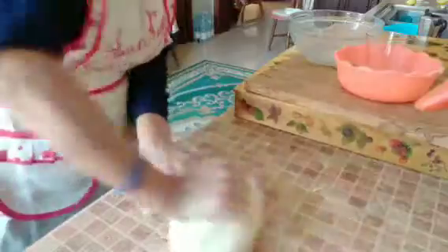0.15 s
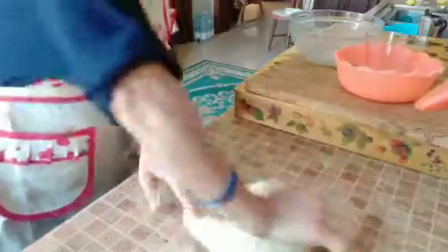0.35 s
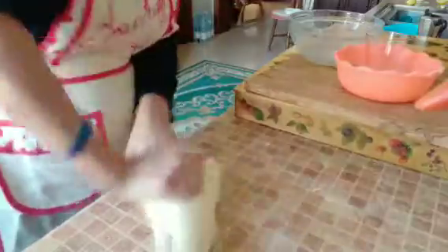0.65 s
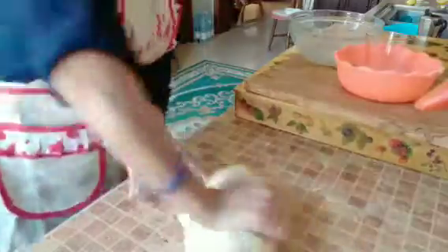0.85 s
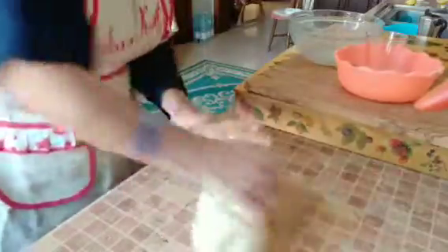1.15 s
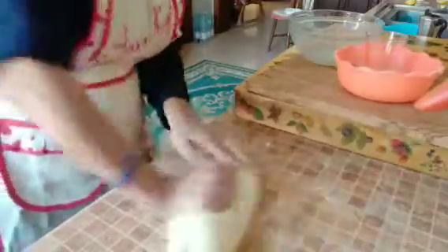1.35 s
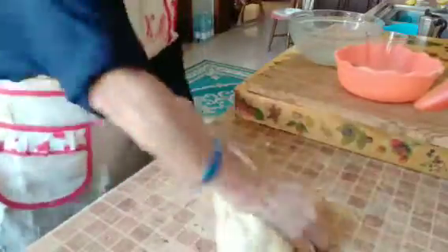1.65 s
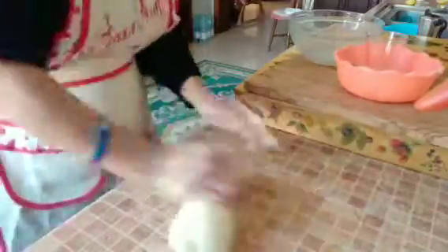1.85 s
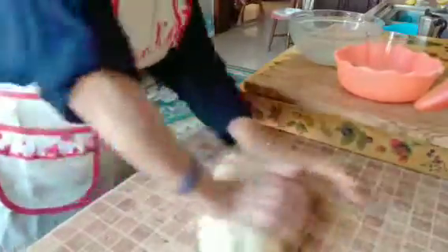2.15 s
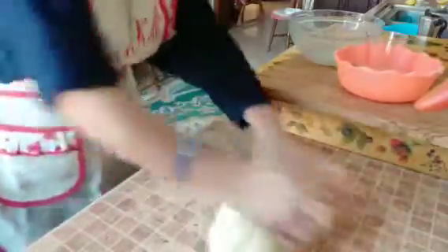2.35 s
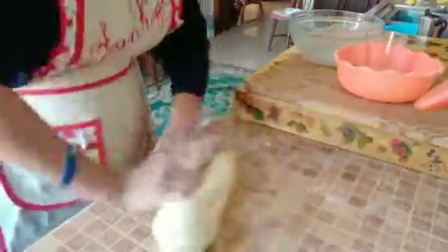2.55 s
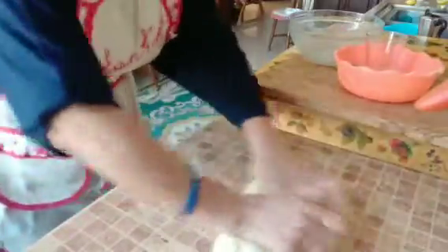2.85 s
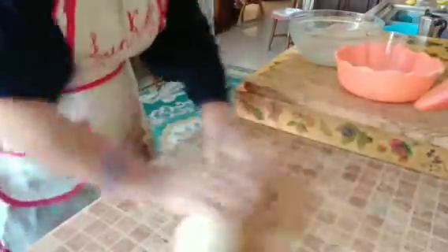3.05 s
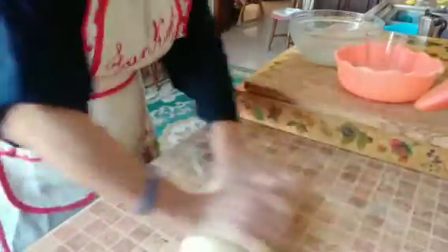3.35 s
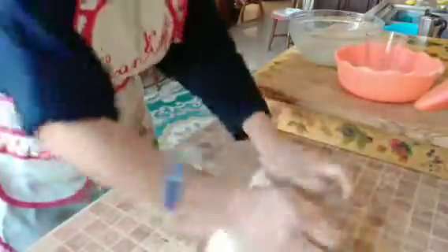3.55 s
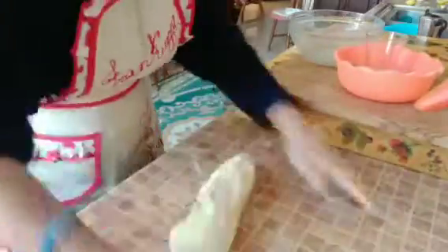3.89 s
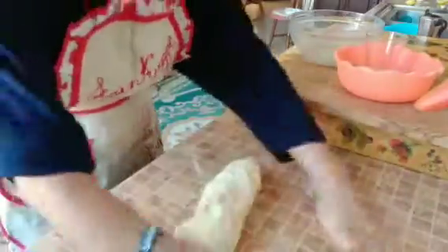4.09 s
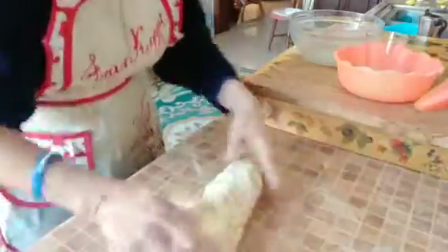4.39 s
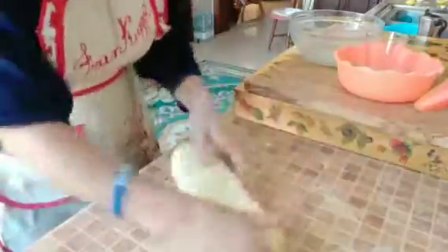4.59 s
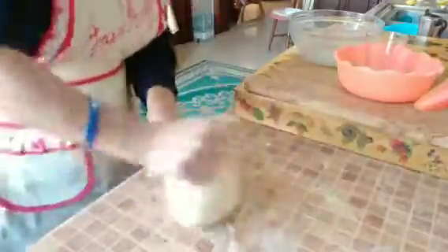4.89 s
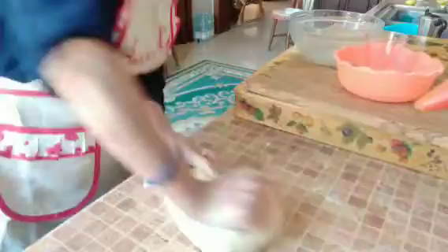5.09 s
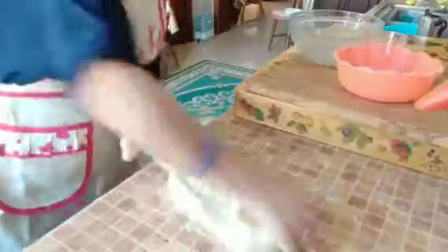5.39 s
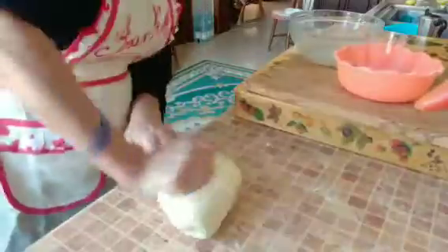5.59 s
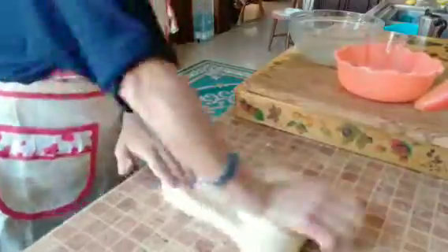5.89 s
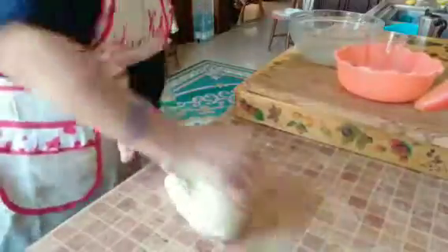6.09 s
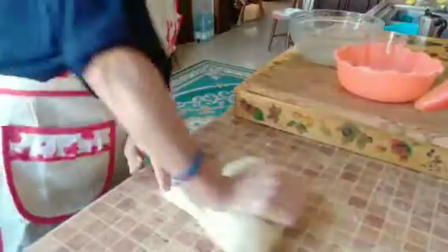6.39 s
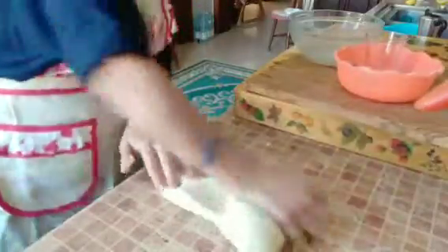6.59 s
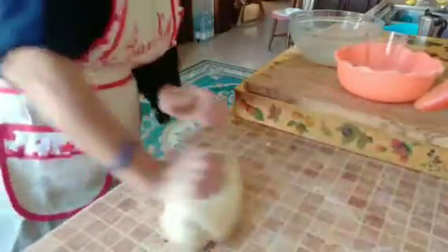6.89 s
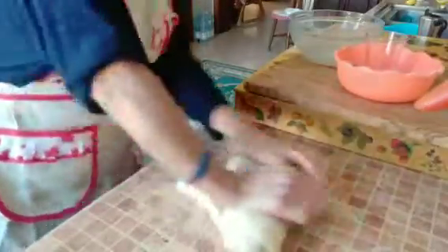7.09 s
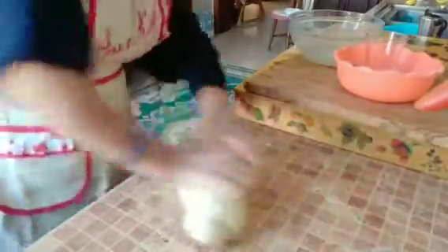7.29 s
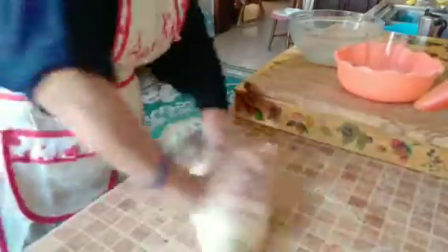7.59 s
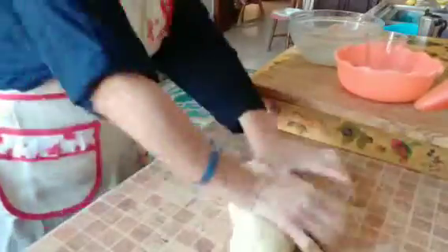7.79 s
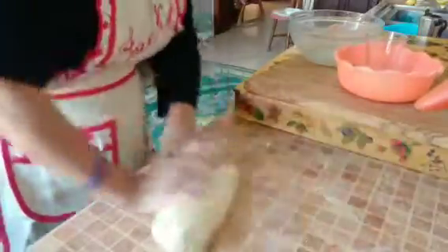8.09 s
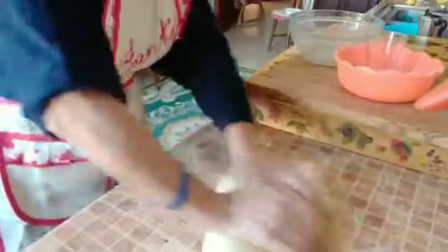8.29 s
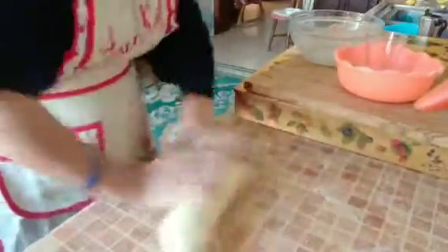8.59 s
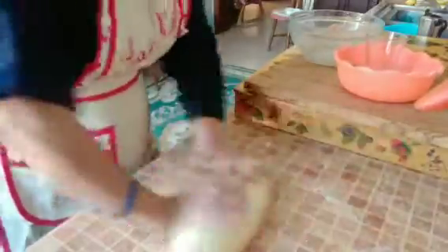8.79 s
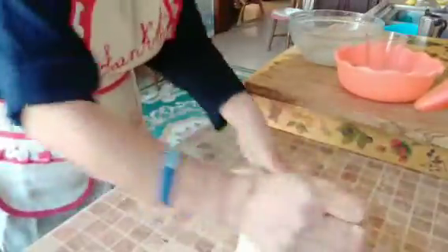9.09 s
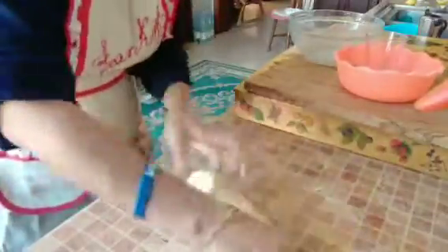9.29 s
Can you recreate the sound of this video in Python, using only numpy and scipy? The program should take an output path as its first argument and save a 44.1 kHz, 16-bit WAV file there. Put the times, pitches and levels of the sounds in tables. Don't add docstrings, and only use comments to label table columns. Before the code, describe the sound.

Dough is pushed and folded on a shaky tabletop, with rhythmic floury scuffs, low thumps and one harsh double sweep across the bare surface.

```python
import sys
import numpy as np
from scipy import signal
from scipy.fft import rfft, irfft, next_fast_len
from scipy.io import wavfile
from scipy.ndimage import uniform_filter1d

SR = 44100
rng = np.random.default_rng(int(sys.argv[2]) if len(sys.argv) > 2 else 0)


def to_linear_factor(level_db):
    exponent = np.asarray(level_db, float) / 20
    return 10 ** exponent


def wav_record(signal):
    frames = np.transpose(np.atleast_2d(signal))
    bounded = np.clip(frames, -1, 1)
    quanta = np.round(bounded * 32767).astype(np.int16)
    wavfile.write(sys.argv[1], SR, quanta)


N = 416744


def evened(x):
    return x / np.sqrt(np.mean(x ** 2) + 1e-20)


def read(points, hz):
    f, value = np.transpose(points)
    return np.interp(np.log(hz + 1), np.log(f + 1), value)


def wander(hz):
    t = np.arange(0, N + 64, 64) / SR
    slow = 0
    for f in np.geomspace(hz / 20, hz, 24):
        slow = slow + np.sin(2 * np.pi * (f * t + rng.random())) / np.sqrt(f)
    return evened(np.interp(np.arange(N) / SR, t, slow))


def patches(shape, bins, frames):
    noise = uniform_filter1d(rng.standard_normal(shape), bins, axis=0)
    return evened(uniform_filter1d(noise, frames, axis=1))


def ring(x, modes):
    out = 0
    for k, (hz, width, db) in enumerate(modes):
        b, a = signal.iirpeak(hz, hz / width, SR)
        out = out + (-1) ** k * to_linear_factor(db) * signal.lfilter(b, a, x)
    return out


# (frequency [Hz], likeness [-1 to 1])
LIKENESS = [(60, 0.97), (150, 1), (300, 0.68), (700, 0.54), (1400, 0.39), (2500, 0.21), (5000, 0.068),
            (10000, 0.16)]
# (frequency [Hz], left over right [dB])
LEAN = [(60, 3), (120, -0.5), (240, -1.5), (480, 1), (950, 0.5), (1890, 0.0), (3770, -2.0), (7520, -6),
        (15000, 3.5)]


def ports(a, b, colour=((1, 0), (2, 0)), lag_s=0):
    size = next_fast_len(N)
    hz = np.fft.rfftfreq(size, 1 / SR)
    same = np.clip(read(LIKENESS, hz), -1, 1)
    za, zb = rfft(a, size), rfft(b, size)
    lean = to_linear_factor(read(LEAN, hz) / 2) * np.exp(-1j * np.pi * hz * lag_s)
    left = za * lean
    right = (same * za + np.sqrt(1 - same ** 2) * zb) / lean
    return irfft(np.array([left, right]) * to_linear_factor(read(colour, hz)), size)[:, :N]


# (frequency [Hz], level [dB per Hz])
AIR_COLOUR = [(12, -33), (20, 11), (60, -14.5), (127, -7), (193, -23.5), (255, -15), (499, -25),
              (590, -23.5), (738, -49), (1150, -27.5), (4300, -32), (7950, -30.5), (13500, -32.5),
              (14700, -29), (16000, -65)]


def kitchen_air():
    return to_linear_factor(-57) * evened(ports(*rng.standard_normal((2, N)), AIR_COLOUR))


def fridge():
    turns = np.cumsum(48.64 + 1.1 * wander(5)) / SR
    motor = to_linear_factor(2.5 * wander(10)) * np.sqrt(2) * np.sin(2 * np.pi * turns)
    cabinet = evened(ring(ring(rng.standard_normal(N), [(43.0, 61, 0)]), [(44.8, 66, 0)]))
    return to_linear_factor(-51) * (motor + to_linear_factor(-10.5) * cabinet) * to_linear_factor([[.3], [-.3]])


# (time [s], peak level [dB], length [s])
JOLTS = [
    (2.91, -41, 0.0064),
    (3.18, -32, 0.0055),
    (4.201, -44, 0.0073),
    (5.428, -32.5, 0.0077),
]


def heel_jolts():
    out = np.zeros(N)
    for s, db, length_s in JOLTS:
        bump = np.hanning(round(length_s * SR))
        push = to_linear_factor(db) * np.concatenate([bump, -.5 * np.repeat(bump, 2)])
        out[round(s * SR):][:len(push)] += push
    return out


def blow(t, contact_s):
    chance = rng.random(len(t)) < 200 / SR
    force = 0.6 * np.exp(-t / 0.013) * chance * rng.standard_normal(len(t))
    force[0] = -1.5
    return np.convolve(force, np.hanning(round(contact_s * SR) + 3))[:len(t)]


# (frequency [Hz], width [Hz], level [dB])
PANEL = [(173.7, 21.6, -4), (243.4, 29.7, 1), (287, 40, 2), (427.2, 26.6, -1.5), (506, 48, -11.5)]
# (frequency [Hz], width [Hz], level [dB])
HARD_EDGE = [(594, 47, -0.5), (818.3, 83.5, -2.5), (851.6, 109, -4), (1072, 50, -11.5)]
# (frequency [Hz], width [Hz], level [dB])
THUD = [(334, 430, 0)]
# (time [s], upper tones [dB])
PLACE = [(.1, -6), (.45, 3), (1.02, -5), (2.3, 0), (3.17, 2), (3.65, 4), (4.0, 8), (4.44, 0), (5.34, -3),
         (5.43, -3), (6.0, 0.5), (6.56, 2), (7.28, 2), (7.9, -2), (8.5, 2), (8.95, 2), (9.25, -4),
         (9.27, -3)]


def pushes(rows):
    out, t = np.zeros((2, N + SR)), np.arange(SR // 4) / SR
    for s, db, hz, sway_db, edge_db, rock_s in rows:
        rock = t ** 0.7 * np.exp(-t / 0.011) * np.sin(2 * np.pi * hz * t - 1.2)
        out[:, round((s + rock_s) * SR):][:, :len(t)] += to_linear_factor(db + sway_db + 3.0) * rock / abs(rock).max()
        landing = blow(t, 0.0011)
        upper_db = np.interp(s, *np.transpose(PLACE))
        panel = [(f, width, mode_db + upper_db * (f > 350)) for f, width, mode_db in PANEL]
        # level dB, softness of the contact in samples, tones
        for part_db, soft, modes in [(6.0, 45, panel), (5.5, 70, THUD), (edge_db + 5.5, 22, HARD_EDGE)]:
            softened = np.convolve(landing, np.hanning(soft + 2))[:len(t)]
            sound = ring(softened, modes) * np.exp(-t / 0.77)
            heard = np.array([sound, np.gradient(sound)])
            heard = heard / abs(heard).max(1)[:, None]
            out[:, round((s + .006) * SR):][:, :len(t)] += to_linear_factor(db + part_db) * heard
    return ports(*out[:, :N])


KNOCK_ROCK_S, SHOVE_ROCK_S = .005, .002

# (time [s], panel level [dB], hard edge against the panel [dB])
TAPS = [(.279, -61, 0), (.544, -55, -6), (.655, -58.5, -5), (1.084, -58, 0), (1.824, -60.5, 8),
        (2.396, -57, -5), (2.479, -62, -2), (2.734, -59, 2.5), (2.846, -62, 2), (2.995, -62, 5),
        (3.06, -60, 3), (3.344, -61, 2), (3.419, -59, 1), (3.628, -55, -8), (4.007, -50, 2),
        (4.036, -53, 7.5), (4.218, -61.5, 3), (4.381, -63.5, 8), (4.429, -49.5, -1), (4.55, -57, -2),
        (5.127, -58, -5), (5.216, -57, -3), (5.349, -54, 5.5), (5.86, -64, 1), (6.545, -48, -8),
        (7.103, -59, -3), (7.231, -59, -5), (7.879, -55, -3), (7.976, -65, 4), (8.329, -58, -7),
        (8.498, -57, -3), (9.355, -54.5, -0.5), (.453, -41, -8), (.436, -55, -2), (1.023, -49, 7),
        (3.015, -59, 5), (3.035, -60, 4), (3.695, -54, -2), (6.559, -47, 5), (7.258, -53, -1),
        (7.305, -57, 2.5), (.559, -53.5, -9)]
# (time [s], sway level [dB], sway frequency [Hz])
MORE_ROCKS = [(3.978, -43, 85), (4.522, -46.5, 120), (4.546, -48, 110), (9.3, -41, 100), (.142, -52, 102),
              (1.389, -54, 100), (1.474, -53, 116), (1.663, -56, 94), (2.242, -52, 92), (2.676, -56, 105),
              (2.993, -53, 97), (3.195, -46, 97), (3.672, -44, 110), (4.036, -49, 92), (4.41, -47, 103),
              (6.102, -47, 94), (6.585, -45, 101), (7.115, -47, 92), (7.34, -48, 110), (7.364, -48, 118),
              (7.41, -46, 118), (7.989, -54, 100), (8.349, -51, 98), (9.105, -51, 97), (3.36, -52, 110),
              (3.42, -49, 105), (3.47, -53, 100), (5.6, -53, 105), (8.82, -51, 120), (4.57, -49, 100)]


def fingers():
    taps = [(s, db, 100, -20, edge_db, KNOCK_ROCK_S) for s, db, edge_db in TAPS]
    rocks = [(s, db - 30, hz, 30, 0, SHOVE_ROCK_S) for s, db, hz in MORE_ROCKS]
    return pushes(taps + rocks)


# (time [s], panel level [dB], sway frequency [Hz],
# sway against the panel [dB], hard edge against the panel [dB])
KNOCKS = [(.093, -54, 97, 2, -13), (.298, -59, 90.6, 5, -8), (.445, -38, 110, -7, -11),
          (.574, -55, 74, -12, -14), (1.012, -36.5, 102.7, -7, -2.5), (1.075, -49, 100, 4, -24),
          (2.289, -62.5, 93, 6, 9.5), (3.65, -47.5, 119.4, 7, 2), (3.998, -54, 72, -11, 10),
          (4.019, -54, 73.5, 7, 12), (4.943, -57.5, 97, 2, -9), (5.327, -50, 100, -6, -10),
          (5.34, -42, 107, -1, -16), (5.379, -55, 89, 14, 1), (5.421, -48, 102, 7, -16),
          (5.96, -49.5, 128, 0, -14), (6.555, -31.5, 94.4, -3, -4.5), (6.679, -53, 90, 9, -15),
          (7.279, -50, 111, 7.5, -19), (7.903, -49, 93, 2, -21), (8.935, -49, 94, -.6, -22),
          (8.992, -46.5, 81.5, -20, -6), (9.253, -38, 73.5, -12, -10), (9.267, -33.5, 90, -4, -19)]
# (time [s], sway level [dB], sway frequency [Hz],
# panel against the sway [dB])
SHOVES = [(.347, -48, 99, -12), (1.209, -51, 107, -11), (1.796, -44.5, 101, -17), (1.879, -44, 104, -19),
          (1.96, -51, 106, -16), (2.091, -50.5, 110, -7.5), (2.131, -52, 110, -3.5),
          (3.751, -49.5, 115, -14), (4.79, -54.5, 110, -23), (5.909, -47, 114, -9), (6.199, -51, 110, -12),
          (6.27, -50, 112, -19), (6.9, -55, 127, -13), (7.49, -51, 125, -13), (8.041, -53, 110, -20),
          (2.419, -50, 108, -20), (2.595, -43.5, 75, -21), (2.905, -44, 88.5, -16), (3.132, -43, 105, -28),
          (3.175, -44.5, 93, -11.5), (3.952, -36.5, 88, -19), (4.441, -35.5, 108, -30),
          (4.495, -40, 113, -23), (4.69, -44, 97, -11), (5.259, -45, 102, -13), (6.05, -37.5, 100, -15),
          (6.812, -44.5, 110, -36), (7.379, -44.5, 122, -19), (8.526, -43, 106, -5.5)]


def heel():
    knocks = [row + (KNOCK_ROCK_S,) for row in KNOCKS]
    shoves = [(s, db + panel_db, hz, -panel_db, -4.5, SHOVE_ROCK_S) for s, db, hz, panel_db in SHOVES]
    return pushes(knocks + shoves)


def cracks(rows):
    out, t = np.zeros((2, N + SR)), np.arange(1800) / SR
    for s, db, hz, pan_db, length_s in rows:
        shape = np.exp(-t / max(length_s, .0003)) + 0.13 * np.exp(-t / 0.011)
        burst = ring(shape * rng.standard_normal((2, len(t))), [(hz, 0.87 * hz, 0)])
        burst = ring(burst, [(hz, 1.0 * hz, 0)])
        crack = ring(burst, [(hz, 0.23 * hz, 0), (3300, 900, -18), (12500, 2000, -10)])
        crack = to_linear_factor([[pan_db / 2], [-pan_db / 2]]) * crack / abs(crack).max(1)[:, None]
        out[:, round(s * SR):][:, :len(t)] += to_linear_factor(db + 5.5) * crack
    return out[:, :N]


# (time [s], peak level [dB],
# # frequency [Hz], left over right [dB], length [s])
MORE_CRACKS = [(3.6515, -47, 3720, -3, .004), (4.435, -46, 6200, -2, .003), (4.841, -54, 8600, -2, .003),
               (6.923, -50, 7650, -3, .003), (7.495, -51, 8300, -4, .004), (7.495, -56, 4200, -4, .004),
               (7.903, -45, 7900, -3, .003), (8.723, -54, 6460, -1, .003), (9.35, -52, 4000, -4, .003),
               (.568, -58, 1100, 0, .012), (.66, -58, 1700, 0, 0.0037), (2.6115, -31, 8250, -4, .0015),
               (4.0, -44, 7500, -4, .008), (4.012, -43, 7000, -4, .006), (4.024, -44, 6000, -4, .006),
               (4.04, -45, 8000, -4, .008), (4.05, -45, 7200, -4, .005), (4.148, -41, 6800, -4, .008),
               (4.0, -51, 2080, -2, 0.014), (4.04, -49, 2500, -2, .015), (4.172, -49, 2800, -2, .008),
               (3.657, -49.5, 1700, -3, .006)]


def more_cracks():
    return cracks(MORE_CRACKS)


# (time [s], peak level [dB], frequency [Hz], left over right [dB], length [s])
SCUFFS = [(.57, -52.5, 2000, 0, 0.0095), (3.656, -50, 1490, 0, 0.0057), (3.999, -44.5, 404, 3, .03),
          (3.998, -41, 1070, 0, .03), (5.378, -42, 1400, -1, 0.013), (.432, -53, 520, -2, 0.023),
          (4.433, -53, 590, 0, 0.005), (3.653, -51, 690, 0, 0.0086), (6.56, -37.5, 620, -3, 0.011),
          (9.268, -53, 1340, 0, 0.0087), (4.03, -49, 1760, -2, .02)]


def palm_scuffs():
    return cracks(SCUFFS)


# (time [s], peak level [dB], frequency [Hz], left over right [dB], length [s])
SNAPS = [(0.092, -50.5, 7900, -8, 0.0015), (0.44, -46, 7100, -8, 0.0027), (0.443, -46, 6500, -4, .003),
         (1.019, -40.5, 7760, -3, 0.0044), (2.294, -44, 7300, -3, 0.0025), (2.608, -34, 12000, 4, 0.006),
         (2.6114, -26.5, 9930, -13.5, 0.00061), (2.6134, -34, 9100, -4, 0.0048),
         (2.633, -44, 9000, 3, 0.004), (3.653, -43, 5360, -4, 0.0063), (3.657, -42, 7600, -5, 0.0022),
         (3.96, -54, 6660, -2, .003), (4.445, -45, 6200, -2, 0.0044), (5.386, -39, 7500, -3, 0.0027),
         (8.95, -41.5, 7300, -11, 0.0022), (8.952, -41, 6840, -7, .0012), (9.261, -42, 10000, 2, .003),
         (9.355, -55, 7600, -4, 0.0035), (2.6112, -39, 3400, -6.5, 0.00059)]


def dough_snaps():
    return cracks(SNAPS)


def strokes(rows, roundness, column=3, linger=1):
    t, rows = np.arange(0, N + 64, 64)[:, None] / SR, np.array(rows)
    off = t - rows[:, 0]
    away = np.where(off < 0, -off / abs(rows[:, 1]), off / abs(linger * rows[:, 2]))
    gains = to_linear_factor(rows[:, column] - 23 * np.minimum(away, 4) ** roundness)
    return np.interp(np.arange(N) / SR, t[:, 0], np.sqrt((gains ** 2).sum(1)))


# (peak time [s], rise [s], fall [s], rubbing level [dB])
FOLDS = [(0, .05, .07, -62.5), (.094, .04, 0.063, -62.5), (.30, .12, 0.19, -58.5), (.62, 0.12, 0.12, -60.5),
         (.86, 0.19, 0.37, -59), (1.22, 0.15, 0.12, -63.5), (1.47, 0.22, 0.31, -60),
         (1.71, 0.12, 0.18, -56.5), (2.21, 0.26, 0.11, -56.5), (2.32, 0.11, 0.3, -58),
         (2.53, 0.078, 0.096, -73), (2.66, 0.1, 0.15, -60.5), (3.22, 0.16, 0.055, -71),
         (3.74, .1, 0.092, -61), (4.87, 0.16, 0.16, -65), (5.12, 0.13, 0.29, -62),
         (5.27, 0.093, 0.058, -56.5), (5.75, 0.12, 0.16, -61), (5.9, 0.16, 0.053, -60.5),
         (6.33, 0.16, 0.5, -63.5), (6.95, 0.075, .25, -61.5), (7.12, 0.12, 0.095, -59),
         (8.17, 0.1, 0.16, -64), (8.35, 0.21, 0.12, -57.5), (8.77, 0.072, 0.34, -58),
         (9.17, 0.026, 0.14, -63.5), (9.41, 0.13, 0.06, -54.5)]


def folding(linger=1):
    return strokes(FOLDS, 2.16, linger=linger)


# (peak time [s], rise [s], fall [s], rubbing level [dB],
# weight on the table [dB])
PRESSES = [(.49, 0.077, 0.061, -48.5, -50), (.575, 0.05, 0.041, -56.5, -58),
           (1.07, 0.1, 0.13, -54.5, -55.5), (1.84, 0.097, 0.079, -56, -60.5),
           (2.42, 0.052, 0.091, -68, -62), (2.9, 0.27, 0.085, -52.5, -62), (3.05, 0.094, 0.2, -51.5, -58.5),
           (3.43, 0.28, 0.35, -54.5, -60.5), (3.67, 0.057, 0.08, -56.5, -55.5),
           (4.44, 0.12, 0.059, -55.5, -58), (4.61, 0.19, 0.15, -50, -61.5), (5.41, 0.12, 0.2, -49.5, -52.5),
           (5.52, 0.24, 0.084, -52.5, -63), (6.01, 0.1, 0.18, -52, -58.5), (6.15, 0.15, 0.081, -53, -58.5),
           (6.63, 0.13, 0.21, -53.5, -53), (6.73, 0.2, 0.11, -49.5, -55), (7.3, 0.098, 0.11, -52, -54.5),
           (7.53, 0.063, 0.25, -52.5, -66), (7.68, .15, 0.32, -57, -71), (7.91, 0.088, .12, -53, -56),
           (8.55, 0.1, 0.12, -49.5, -52.5), (8.98, 0.064, .2, -50, -56.5), (9.27, 0.023, 0.033, -48.5, -60)]


def pressing(column=3, linger=1):
    return strokes(PRESSES, 1.415, column, linger)


# (time [s], rubbing level [dB])
SWEEP = [
    (3.938, -80),
    (3.947, -57.5),
    (3.985, -49.5),
    (4.016, -38),
    (4.106, -44.5),
    (4.156, -40),
    (4.225, -45),
    (4.25, -56.5),
    (4.32, -67),
]


def sweeping():
    s, db = np.transpose(SWEEP)
    return to_linear_factor(np.interp(np.arange(N) / SR, s, db, -120, -120))


# (frequency [Hz], width [Hz], level [dB])
SWAY = [(75, 13, -1.5), (108, 10.8, 0), (156, 54, -11)]


def shaking():
    usual_db, sweep_weight_db, linger = -65, -25, 1.1
    lumps = rng.standard_normal((3, 2, N))
    grip_db = 2.0 * wander(50)
    palms = sweeping()
    load = to_linear_factor(-77) + to_linear_factor(-10.5) * folding(linger) + to_linear_factor(sweep_weight_db) * palms
    load = (load + pressing(column=4, linger=linger)) / to_linear_factor(usual_db)
    scrape_load = load + to_linear_factor(13 + sweep_weight_db - usual_db) * palms
    sway = evened(ring(ring(lumps[0], SWAY), [(110, 120, 0)]))
    sway = load ** 0.6 * to_linear_factor(-58 + 3.1 * wander(30)) * sway
    shake = evened(ring(ring(lumps[1], PANEL), [(368, 480, 0)]))
    shake = load * to_linear_factor(usual_db + grip_db) * shake
    scrape = evened(ring(ring(lumps[2], HARD_EDGE), [(810, 430, 0)]))
    scrape = scrape_load ** 0.65 * to_linear_factor(-67.5 + grip_db) * scrape
    return ports(*(sway + shake)) + ports(*scrape, lag_s=.0001)


def grit(per_s, spread_db):
    sizes = to_linear_factor(spread_db * np.minimum(rng.exponential(1, (2, N)), 5))
    slips = sizes * (rng.random((2, N)) < per_s / SR) * rng.standard_normal((2, N))
    return evened(slips) + 0.51 * rng.standard_normal((2, N))


# (frequency [Hz], level [dB per Hz])
GRIT_COLOUR = [(1760, -26), (3000, -11.5), (3260, -10.5), (3730, -11), (5250, -6), (7400, 0), (9330, -2),
               (10100, -4.5), (15000, -9.5), (16000, -7)]
# (frequency [Hz], level [dB per Hz])
DRAG_COLOUR = [(530, -13), (900, -7), (1230, -2), (1580, -3), (2440, -4.5), (3320, -6.5), (4500, -9.5),
               (5850, -14), (9900, -120)]


def rubbing():
    port_lag_s = 0.0002644
    flutter = to_linear_factor(1.7 * wander(30))
    fold, press, palms = folding(), pressing(), sweeping()
    hiss = to_linear_factor(3.5) * evened(ports(*grit(9000, spread_db=1.5), GRIT_COLOUR, port_lag_s))
    bright = np.sqrt(fold ** 2 + press ** 2 + palms ** 2) * hiss
    drag = evened(ports(*grit(4000, spread_db=3.0), DRAG_COLOUR, port_lag_s))
    dull = to_linear_factor(-10) * fold + to_linear_factor(-8.5) * press + to_linear_factor(-12) * palms
    dull = dull * to_linear_factor(3.0 + 0.46 * wander(40)) * drag
    return flutter * (bright + dull)


def patchy_hiss(x):
    hz, _, z = signal.stft(x, SR, nperseg=2048, noverlap=1536)
    power = abs(z) ** 2 + 1e-30
    nearby = uniform_filter1d(power, size=21, axis=1)
    keep = np.clip(power / nearby - .3, .001, 2.5) ** .5
    keep *= to_linear_factor(1.8 * patches(z.shape[1:], 24, 5))
    keep *= np.where(patches(z.shape[1:], 10, 5) > 1.4, to_linear_factor(-45), 1)
    thinned = z * np.where(hz[:, None] > 900, keep, 1)
    return signal.istft(thinned, SR, nperseg=2048, noverlap=1536)[1][:, :N]


def scene():
    quiet = fridge() + heel_jolts()
    table = fingers() + heel() + shaking()
    sticking = more_cracks() + palm_scuffs() + dough_snaps()
    return quiet + table + sticking + patchy_hiss(kitchen_air() + rubbing())


def roll_off(x):
    return signal.sosfilt(signal.butter(12, 16700, fs=SR, output="sos"), x)


def record(dry):
    low_cut = signal.butter(2, 27, "high", fs=SR, output="sos")
    treble_limit = signal.firwin(801, 15740, window=("kaiser", 7), fs=SR)
    mix = signal.oaconvolve(signal.sosfilt(low_cut, dry), treble_limit[None], "same")
    return roll_off(mix)


dry = scene()
out = record(dry)
wav_record(out)
```